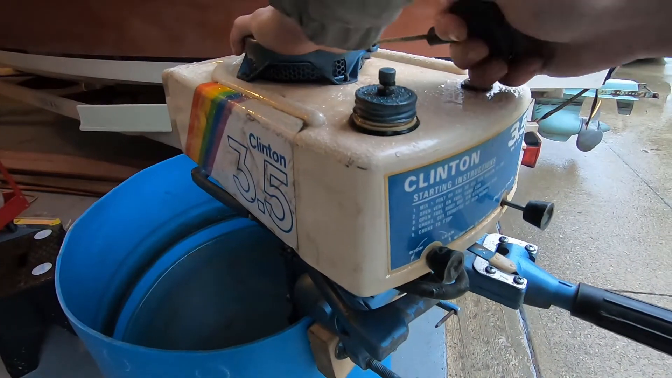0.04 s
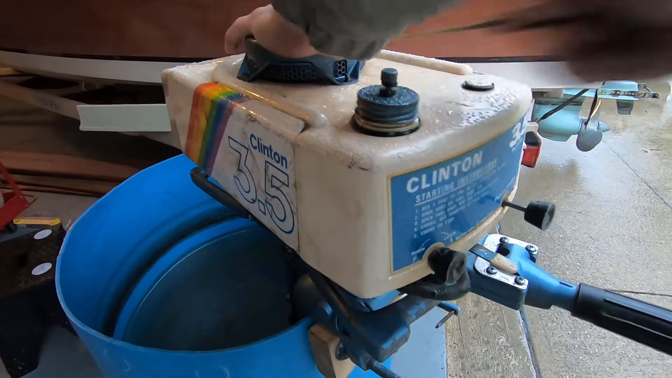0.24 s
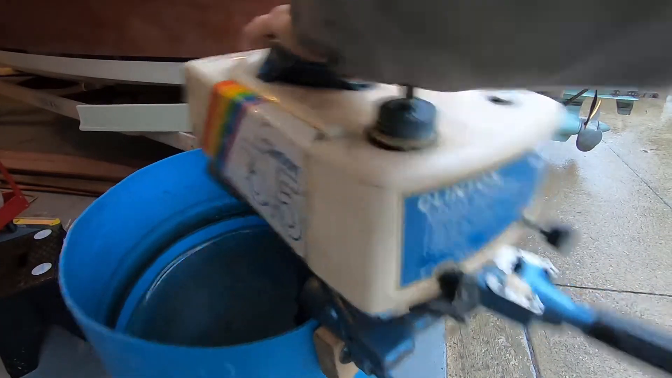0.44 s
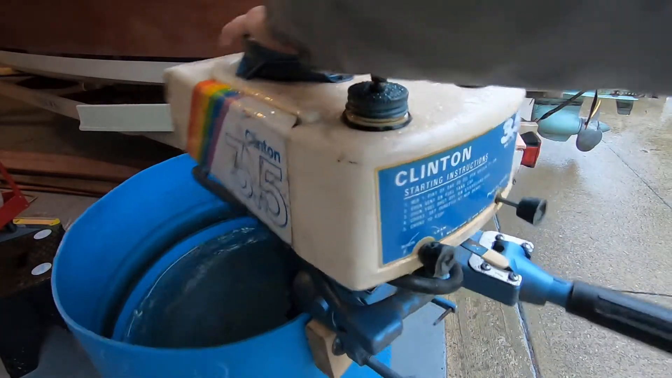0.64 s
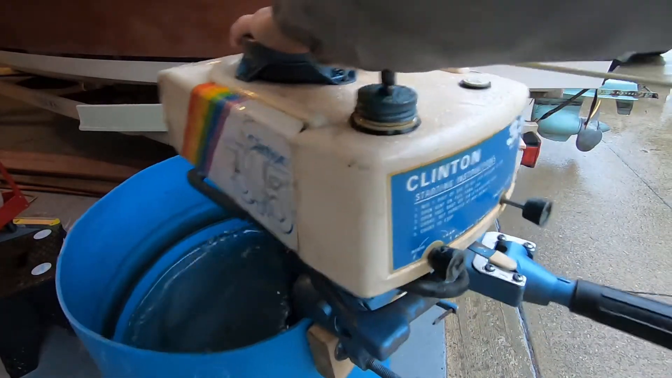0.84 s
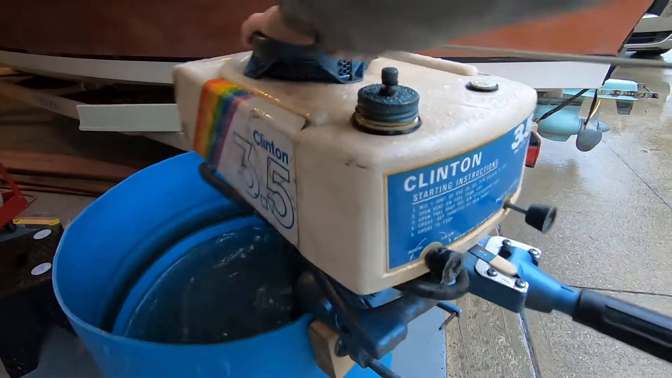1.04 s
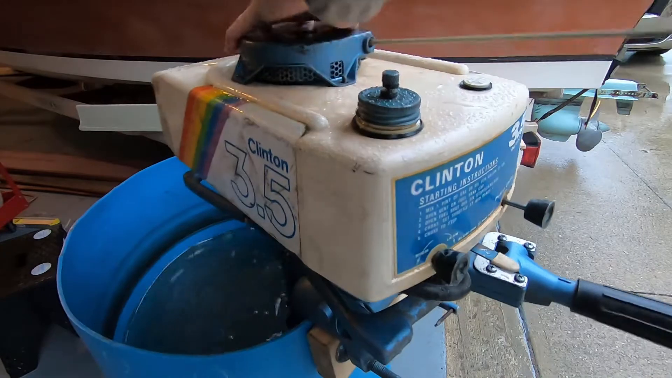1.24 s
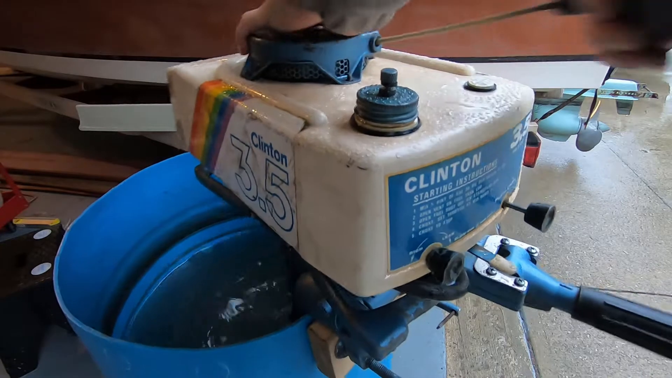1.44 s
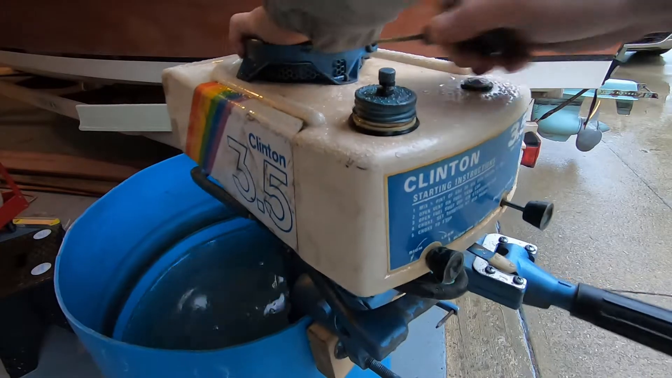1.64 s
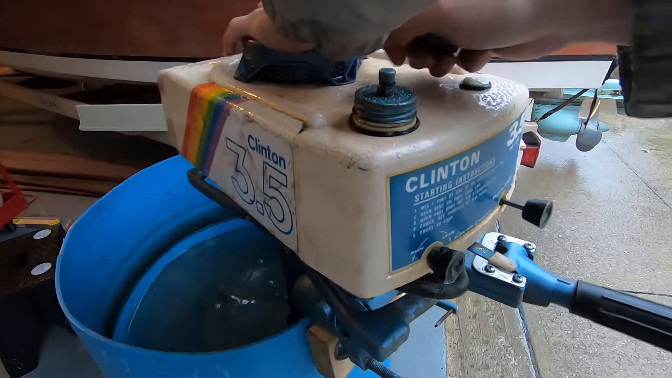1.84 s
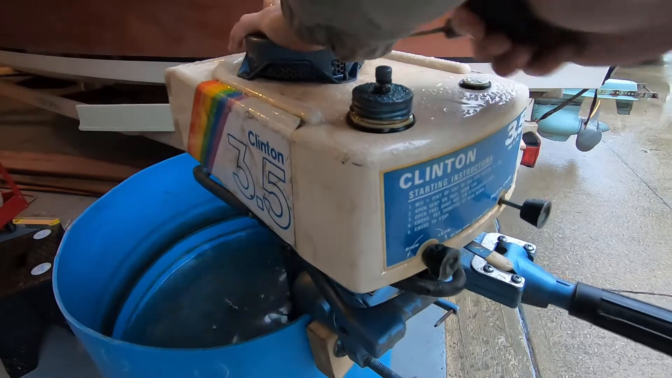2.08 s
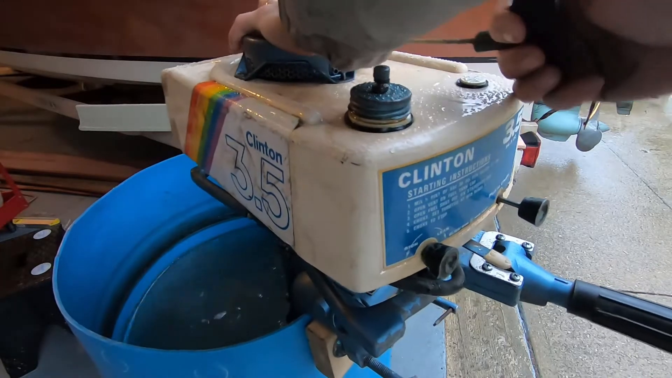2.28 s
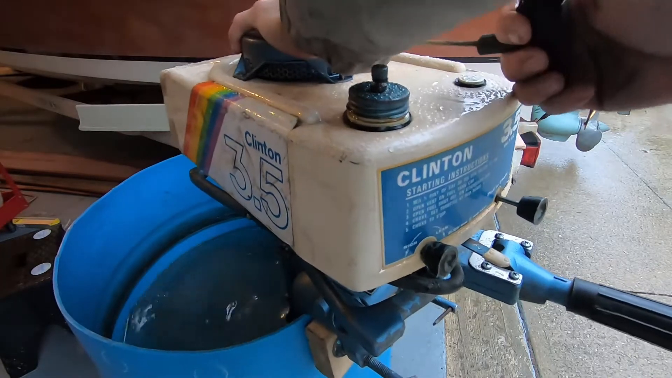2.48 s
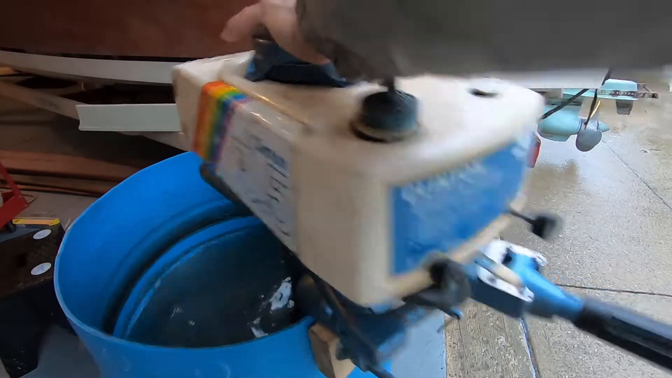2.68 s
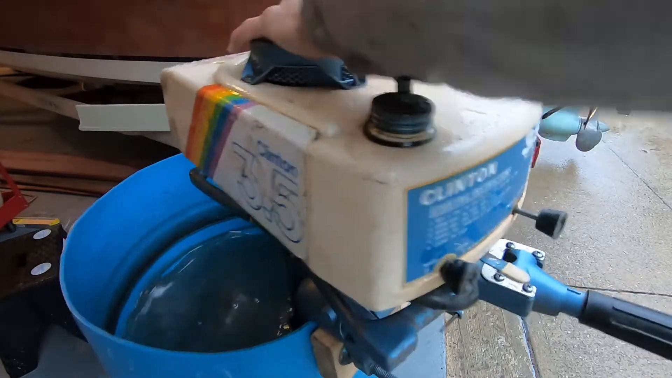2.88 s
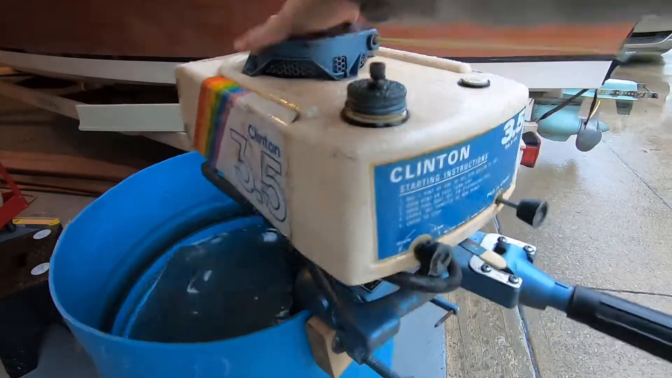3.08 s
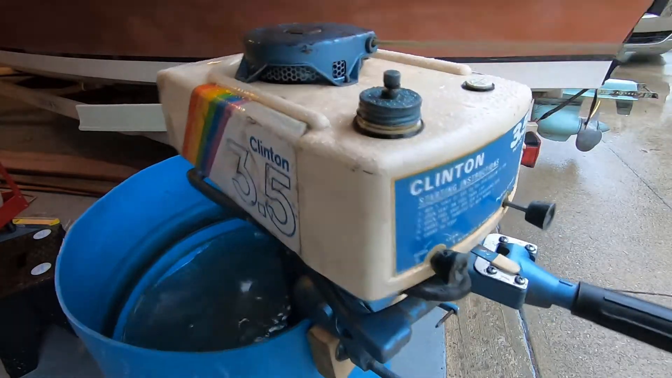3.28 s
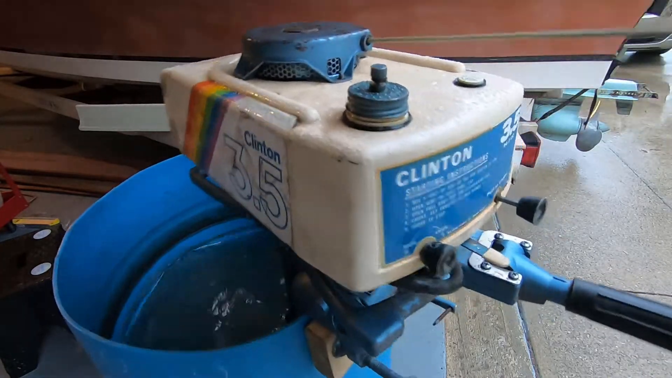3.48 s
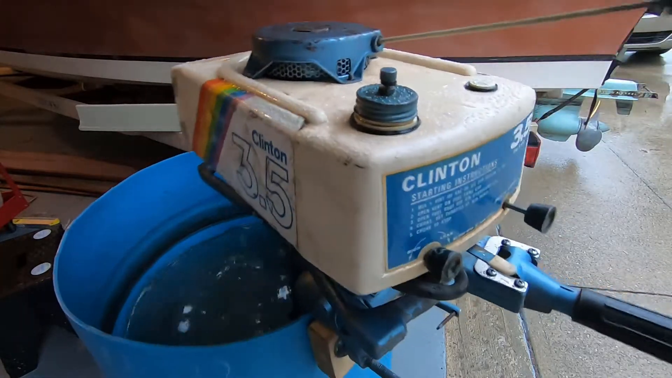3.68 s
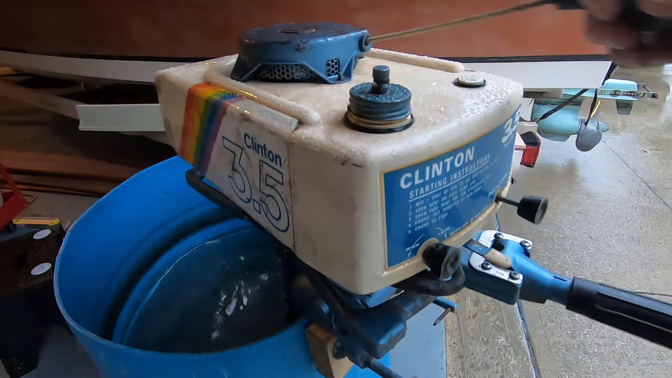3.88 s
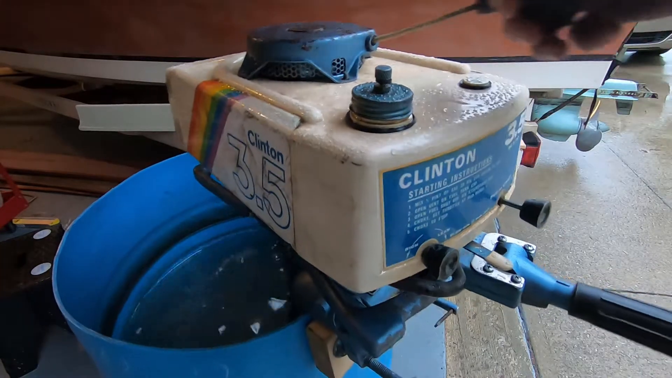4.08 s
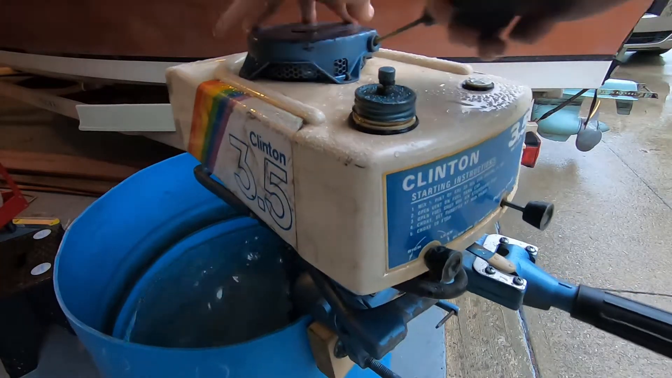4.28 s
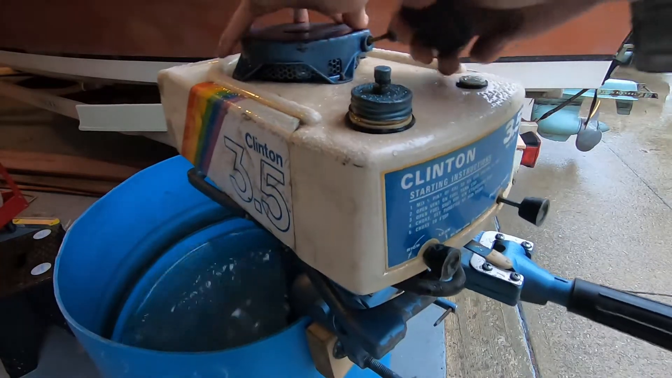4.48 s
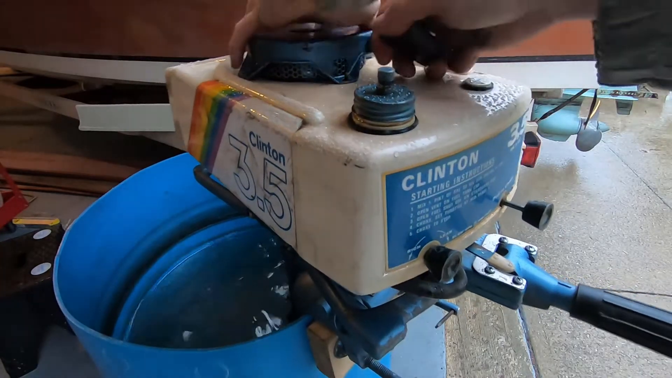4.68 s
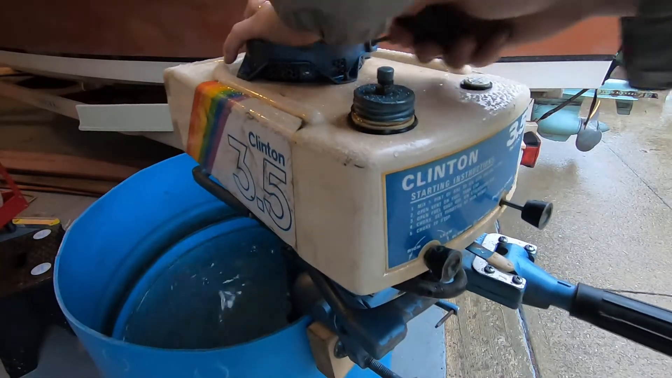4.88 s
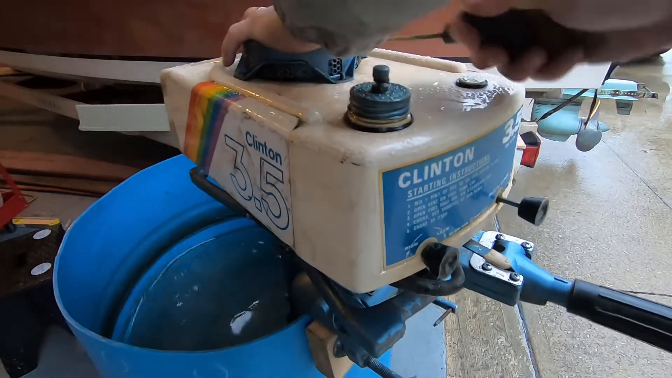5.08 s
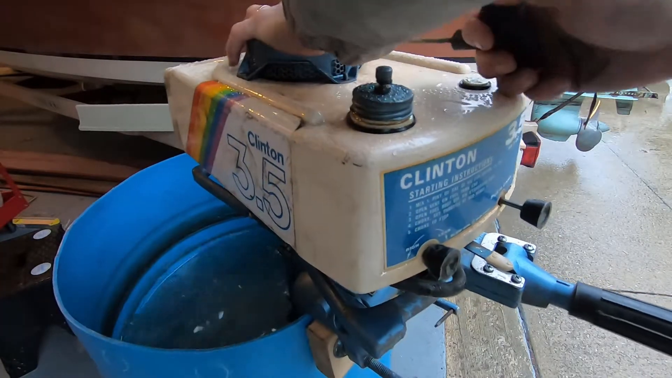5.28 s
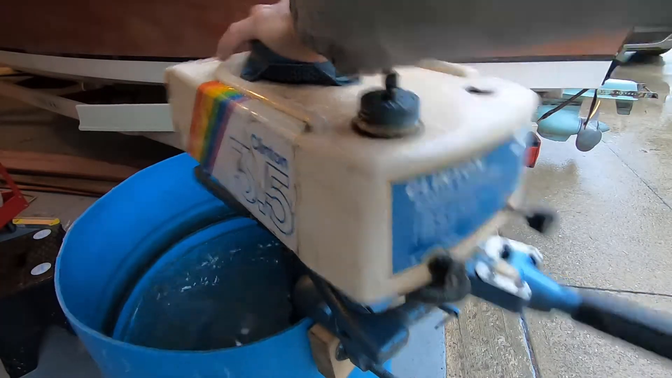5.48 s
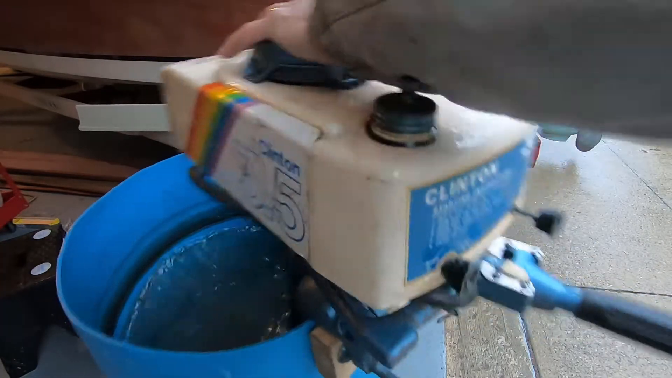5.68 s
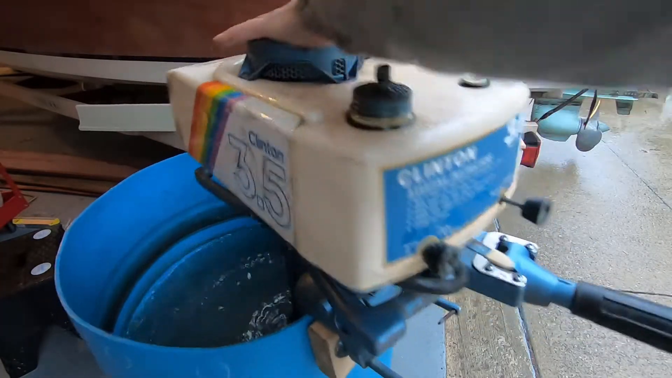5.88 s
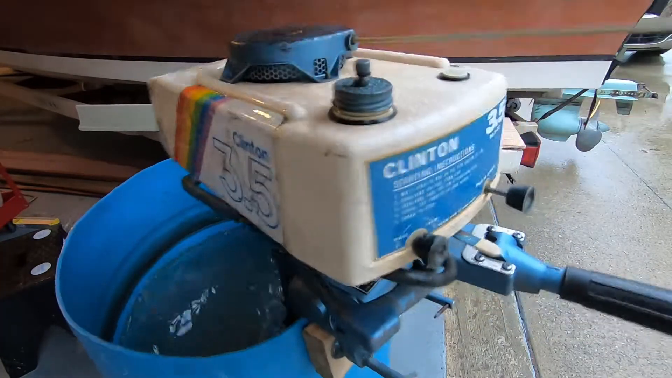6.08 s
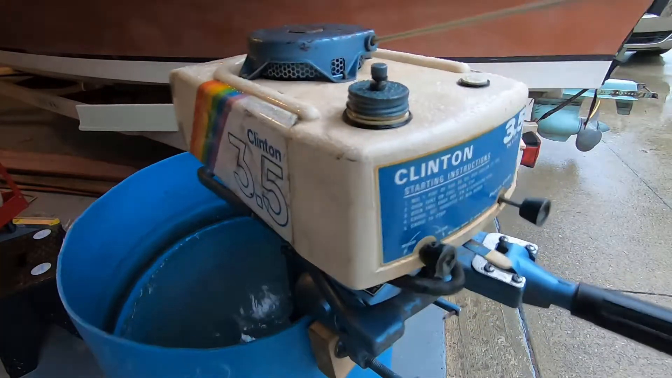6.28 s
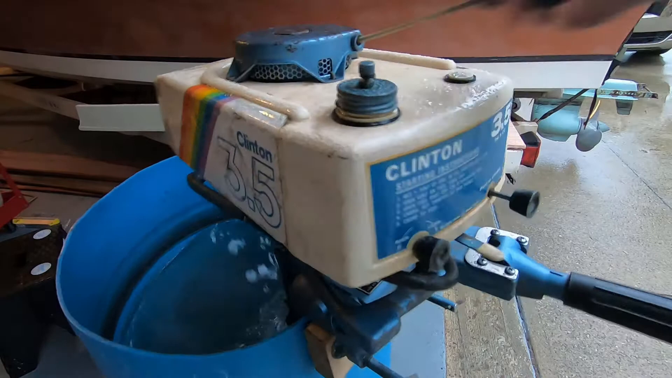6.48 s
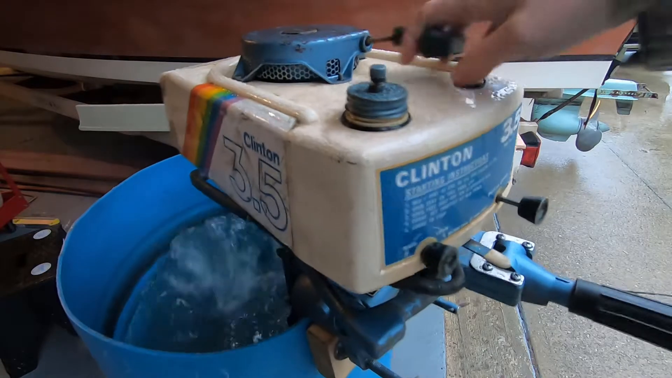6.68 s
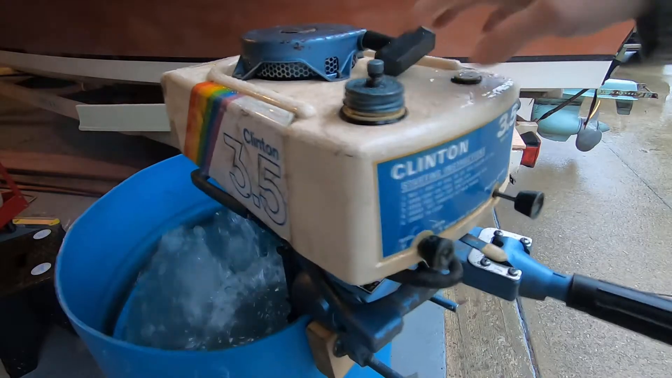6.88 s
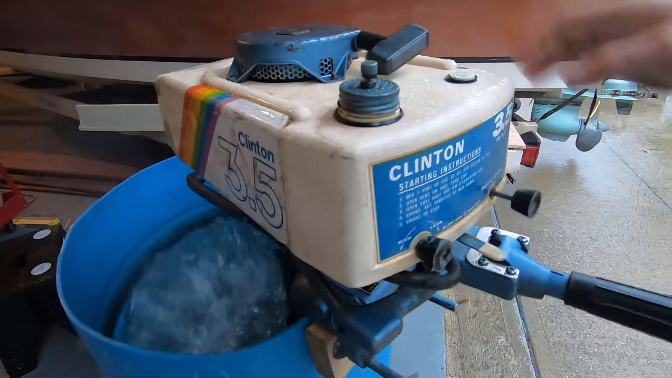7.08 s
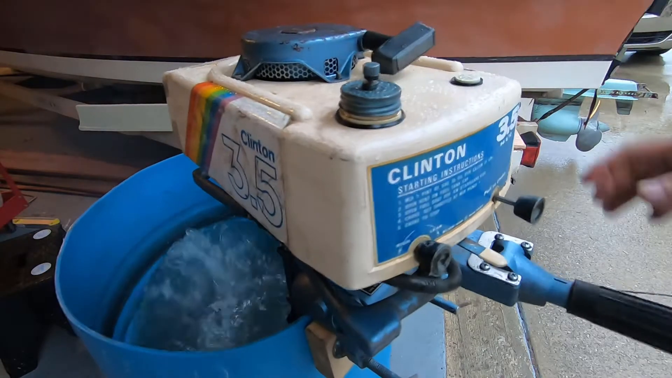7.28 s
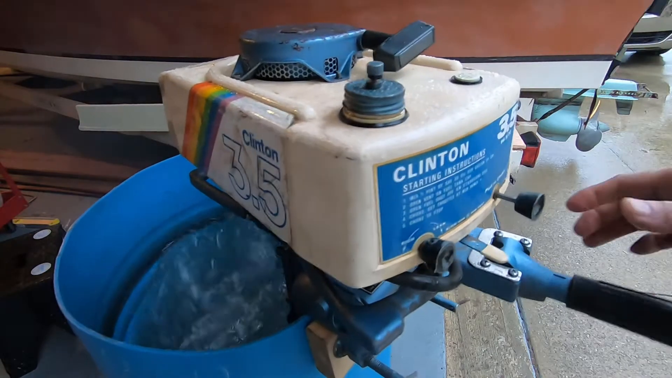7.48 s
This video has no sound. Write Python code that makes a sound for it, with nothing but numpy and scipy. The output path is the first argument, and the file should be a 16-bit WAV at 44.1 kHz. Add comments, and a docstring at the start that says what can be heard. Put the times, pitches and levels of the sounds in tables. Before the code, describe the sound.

A recoil cord is yanked three times on a small two-stroke outboard, with thudding gulps and rattles, until it fires into a buzzy, clattering run.

```python
"""In a garage, a small two-stroke outboard stands in a barrel of water. Its recoil cord is pulled three times:
slips and rattles make the starter's whirr, struck modes its clacks, and noise and low tones the piston's
gulps and chuffs. Between pulls the cord slides back and the pawls catch again. During the third pull it fires,
mostly on every second turn: ringing modes crack in the exhaust leg and boom in the barrel, and bursts of
tiny impacts clatter in every turn. Short pitched blips, a low rumble and the garage's short tail surround it."""
import sys
import numpy as np
from scipy import signal
from scipy.fft import rfft, irfft
from scipy.io import wavfile
from scipy.ndimage import uniform_filter1d

SR = 44100
rng = np.random.default_rng(int(sys.argv[2]) if len(sys.argv) > 2 else 0)


def store_wav(level_fs):
    """Save 16-bit WAV to argv[1]."""
    pcm = np.round(np.clip(np.atleast_2d(level_fs), -1, 1) * 32767)
    wavfile.write(sys.argv[1], SR, pcm.T.astype(np.int16))


N = 332514
TIME = np.arange(N) / SR
AGE = TIME[:SR // 2]  # time since the onset of any single sound, up to half a second

# hard pulls on the cord: (yank [s], arm stops [s], level [dB], run-down [dB/s])
PULLS = [(0.399, 0.72, -29, 48.5), (2.762, 2.988, -29.5, 49), (5.622, 5.878, -29.5, 316)]
YANK_DB_PER_S, TIRE_DB_PER_S = 331, 5.5  # a pull builds up fast and sags slowly
# fading whirr and hiss: the cord winding back, and in the last row the treble of the started motor:
# (start [s], end [s], settled whirr [dB], settled hiss [dB])
FADING_WHIRRS = [(1.201, 1.754, -60.5, -69.5), (3.407, 4.54, -67, -71.5), (6.08, 6.603, -47.5, -46.5)]
RUSH_DB, RUSH_HISS_DB, RUSH_S = 15, 12, 0.11  # each starts with a rush, then settles
# slack drawn out gently until the pawls catch: (start [s], end [s], level [dB])
DRAWS = [(.335, .37, -77), (2.047, 2.3, -56.5), (2.645, 2.74, -52), (4.975, 5.244, -57),
         (5.547, 5.6, -40.5)]
SLIDE_RISE_DB_PER_S, SLIDE_FALL_DB_PER_S = 223, 104  # draws and fading whirrs start and stop softly
FLOOR_DB = -77  # faint steady scrape and hiss under everything
# compression strokes without a spark: (knock time [s], knock [dB], its snap [dB], gulp [dB],
# chuff [dB], chuff lag [s], strain on the starter [dB])
STROKES = [(0.3081, -23.5, -21, -33, -22.5, 0.006, 8), (0.4793, -7.5, -27, -21, -6, 0.025, 4),
           (.561, -6, -14.5, -14.5, -6.5, 0.029, 5), (0.6531, -11, -32, -16, -7.5, 0.018, 1.5),
           (0.7358, -11, -16, -21, -9, 0.029, 1.5), (0.8816, -23, -27, -29, -20.5, 0.037, -1),
           (2.735, -33, -14, -39, -23, .023, -20), (2.8293, -10, -29, -19, -6, 0.0024, 2),
           (2.8893, -6.5, -11.5, -36, -10, 0.01, 5.5), (2.9612, -12, -43, -30, -10.5, .018, -6.5),
           (3.033, -18, -30, -16, -11.5, 0.0185, 5), (3.124, -28, -22, -20, -33, .025, -8),
           (3.203, -24.5, -15, -33.5, -21, 0.0074, -1.5), (3.2641, -14, -31, -28, -48, 0.071, 5),
           (5.67, -9.5, -26, -26.5, -10, 0.019, 7), (5.735, -11.5, -8, -23, -8, .028, 4)]
LOAD_LEAD_S, LOAD_WIDTH_S = 0.036, 0.023  # the starter strains just before each compression
# past each compression the flywheel runs ahead and the cord goes quiet
RELIEF_DB, RELIEF_LAG_S, RELIEF_WIDTH_S = -2.5, 0.029, 0.019
GULP_LEAD_S, GULP_HZ = .013, 460
STROKE_LOW_DB = -6  # thud of a stroke's knock
# tone of the starter's scrape: (frequency [Hz], level [dB])
WHIRR_TONE = [(710, -36), (1200, -20.5), (1520, -9), (1950, 3.5), (2400, -0.5), (3160, 1.5), (3820, 1.5),
              (4870, -11.5), (6000, -15.5), (7800, -72.5), (13200, -120)]
# tone of the low rumble under the scrape: (frequency [Hz], level [dB])
RUMBLE_TONE = [(30, -28), (130, -7), (220, -2), (339, -6), (442, -1), (584, -9), (671, -1), (731, -3),
               (1400, -14.5), (1820, -6.5), (3080, -120)]
# tone of the cord's hiss: (frequency [Hz], level [dB])
CORD_TONE = [(4200, -13.5), (5500, -1), (7400, 0), (8000, -6), (10000, -7.5), (11500, -25), (15000, -31)]
TICK_RATE, TICK_SPREAD_DB = 45, 2.5  # the spring's ticks: mean number per s, unevenness
TICK_DB, TICK_T60_S = -10.5, 0.023  # their level against the whirr, ring
# pawls and spring coils: (frequency [Hz], level [dB])
RATTLE_MODES = [(680, -5.5), (1020, -3), (1950, 2.5), (2700, -8), (3150, 1.5), (3500, -6), (3950, -3),
                (5300, -11), (7200, -15)]
RATTLE_RATE, RATTLE_RANGE_DB, RATTLE_DB = 115, 12, -3.5  # strikes per s, soft to hard, level against the whirr

# loose knocks of handle, pawls and mount: (time [s], level [dB], low band [dB], high band [dB])
CLACKS = [(0.231, -42, -4, -11), (0.5252, -22, -14, -26), (0.7626, -12, -6.5, -13), (0.7931, -13, -8, -20),
          (1.009, -27.5, -3.5, -39), (1.035, -19, -8.5, -25), (1.1128, -27, -6, -14),
          (1.702, -35.5, -28, -31.5), (1.737, -35, -21, -26), (2.2014, -13, -6.5, -11),
          (2.5868, -35.5, 1.5, -11), (2.6129, -33, -3, -19), (2.798, -24, -0.5, -10),
          (3.0697, -9.5, -12, -27), (3.1522, -13.5, -6, -29), (3.281, -13, -9, -21), (3.3446, -27, -4, -11),
          (3.767, -23.5, -19, -12.5), (4.137, -34.5, -23, -3.5), (4.362, -36.5, -14, -24),
          (4.714, -31, 3.5, -16.5), (5.138, -14.5, -6, -8), (5.141, -19.5, -6, -4),
          (5.3887, -37.5, -3.5, -11.5), (5.464, -36.5, -21, -12), (5.5473, -24, 0, -22),
          (5.7235, -10, -9.5, -17), (5.806, -9.5, -4, -26), (5.847, -18, -7, -23), (5.859, -8.5, -4, -15),
          (5.8812, -4.5, -10.5, -17.5), (5.8893, -6, -18, -13.5)]
# starter housing: (frequency [Hz], level [dB], t60 [s])
HOUSING = [(1986, 4, 0.045), (2280, 6, 0.077), (2500, -0.5, 0.13), (2920, -3, 0.072), (3220, -7, 0.056),
           (4070, 11, 0.029), (7400, -9, 0.099)]
HOUSING_SCATTER_DB = 4
# plastic cowl: (frequency [Hz], level [dB], t60 [s])
COWL = [(210.5, -4, 0.28), (352, -10.5, 0.12), (461.6, -3, 0.21), (714, -4.5, 0.17), (1011, 0.5, 0.07),
        (1395, -11, 0.19)]
# the pawls fly free and ring: (time [s], level [dB])
PAWL_FLINGS = [(0.767, -37), (5.889, -24.5)]
# a ringing pawl: (frequency [Hz], level [dB], t60 [s])
PAWL = [(2805, -2, .75), (2918, 0, .55), (3004, -9, .45), (7200, -10, .15), (8030, -23, .3),
        (11700, -23, .2), (12300, -27, .2)]
# light ticks and scrapes of cord, spring and handle: (time [s], level [dB], ringing pitch [Hz], t60 [s])
TICKS = [(.9286, -26, 2900, .035), (1.1664, -24, 2050, 0.084), (1.204, -28, 2100, 0.032),
         (1.245, -24.5, 2550, .018), (1.3382, -34, 3200, .03), (1.661, -34, 2980, 0.028),
         (1.947, -41, 2660, 0.018), (2.032, -47, 7460, 0.019), (2.286, -38.5, 7500, 0.016),
         (2.307, -40, 8000, 0.013), (2.398, -41, 3080, 0.035), (2.633, -36, 3300, 0.021),
         (2.651, -36, 3000, .025), (3.3876, -28, 3170, .02), (3.442, -31, 3000, .04),
         (3.4794, -39, 2600, 0.021), (3.6515, -30, 3080, 0.0092), (3.871, -39, 5170, 0.012),
         (3.951, -36, 2400, 0.038), (4.085, -35, 3260, 0.039), (4.51, -48, 2880, 0.035),
         (4.877, -29, 2680, .025), (4.977, -43, 2980, .04), (5.018, -44, 2700, .035),
         (5.1012, -31, 3230, 0.066), (5.312, -33.5, 2300, 0.039), (5.483, -38, 4200, .016),
         (5.507, -27, 3500, 0.021), (5.516, -34, 4300, 0.013)]
# the taut cord on its pulley: (time [s], length [s], pitch [Hz], glide [octaves/s], level [dB])
SQUEAKS = [(0.422, 0.043, 1960, 1, -21.5), (0.424, 0.032, 728, -12.5, -24.5),
           (0.82, 0.033, 2040, -3.5, -41), (3.019, 0.026, 1407, 3.5, -25.5), (4.497, .025, 2930, -1, -52),
           (4.972, 0.028, 2950, -5, -49), (5.558, 0.16, 2066, 1, -31), (5.639, 0.031, 632, -15, -24)]

CATCH_S, BITE_RISE_S = 5.825, .007  # the first firing; how fast each bite of clatter builds up
# crank speed once the motor has caught: (time [s], speed [turns/s])
SPEED = [(5.825, 16.5), (5.92, 28.34), (6.2, 30.56), (6.38, 30.37), (6.5, 28.26), (6.85, 27.46),
         (7.2, 26.1)]
# it fires on every second turn, except in these spells: (from [s], to [s], firing interval [turns])
SPELLS = [(5.8, 6.0, 1), (6.27, 6.34, 1), (6.97, 7.02, 3), (7.31, 7.36, 3)]
# the running motor: (time [s], clatter [dB], share of the water churned [0-1])
RUN = [(5.8, -15, 0.17), (5.95, -37, 0.13), (6.02, -26.5, 0.1), (6.09, -25.5, 0.4), (6.3, -26, 0.19),
       (6.6, -26.5, 0.8), (7.0, -24.5, 1), (7.54, -25, 1)]
# how well the charge burns: (time [s], firing thump [dB], firing crack [dB], idle turn's puff [dB])
BURN = [(5.83, -7, -23, -14), (6.06, -5.5, -21, -9), (6.2, -5, -18.5, -6.5), (6.42, -5.5, -19.5, -5.5),
        (6.64, -3.5, -20, -4), (6.8, -3, -18, -5), (6.93, -7, -20.5, -5), (7.17, -3.5, -18.5, -4),
        (7.27, -6, -20, -5), (7.45, -4, -17.5, -6.5)]
STALE_DB, STALE_CRACK_DB = -1.5, -10  # a firing is duller if no idle turn has cleared the cylinder
PUFF_SCATTER_DB = 1.2
# exhaust leg and barrel: (calm pitch [Hz], churned pitch [Hz], calm level [dB], churned level [dB], t60 [s])
BARREL = [(90, 110, -43, -4, 0.016), (196, 177, 5, -0.5, 0.069), (242, 220, -22, -23, 0.0079),
          (406.4, 408, -21, -17, 0.23), (617, 510, -18, -35, 0.13), (747, 850, -33, -15, 0.072)]
# the exhaust leg, rung by a firing's crack: (frequency [Hz], level [dB], t60 [s])
LEG = [(425, 0, .075), (525, -1, .06), (755, -7, .055), (1000, -12, .04), (1270, -9, .05)]
LEG_SCATTER_DB, LEG_DETUNE = 3, .035  # detune is a share of the pitch
GURGLE_DB, IDLE_RISE_S = -22, .0075  # level of the bubbles in the barrel; softness of an idle turn's puff
# tone of the clatter: (frequency [Hz], level [dB])
CLATTER_TONE = [(290, -32.5), (500, 2.5), (657, -3), (851, -5.5), (1560, -5.5), (2010, -3), (2260, -4),
                (2610, -3), (4130, -1), (4910, -12), (5350, -8), (7450, -13), (8000, -26.5), (9370, -17),
                (15500, -65)]
# engine castings and cowl: (frequency [Hz], level [dB], t60 [s])
CASTINGS = [(1224, -5, .12), (1798, -7, .14), (2082, -4, .08), (2600, -1, .1), (2966, -2, .08),
            (3200, 0, .05), (3800, -3, .04), (4137, -7, .1), (4266, -1.5, .16), (4580, -6, .08),
            (5277, -4, .12), (6010, -9, .14), (7500, -8, .03)]
CASTINGS_DB, THROAT_SWELL_DB = -10, 4.5  # the castings' ring in the clatter; unevenness of its throaty middle
# engine parts that come and go in the clatter: (frequency [Hz], level [dB])
JANGLES = [(2050, -20), (2600, -17), (3200, -13), (4150, -11)]
JANGLE_SWELL_DB = 5

# short pitched blips, bubbles or light scrapes: (time [s], pitch [Hz], level [dB], t60 [s])
BLIPS = [(.855, 1007, -26.5, 0.12), (4.168, 1710, -33.5, 0.044), (4.19, 3950, -26, 0.012),
         (4.229, 753, -34.5, 0.07), (4.25, 3490, -32, 0.018)]
# tone of the rumble through the open door: (frequency [Hz], level [dB])
AMBIENCE_TONE = [(15, -32), (25, -15), (65, 3), (174, 0), (418, -11.5), (555, -14), (700, -12.5),
                 (1300, -14.5), (2550, -26.5), (3050, -23.5), (4990, -38), (7540, -40.5), (12000, -53),
                 (15600, -70), (22000, -120)]
# stereo width, side against mid: (frequency [Hz], level [dB])
SIDE_TONE = [(60, -21), (130, -32), (220, -34), (380, -25), (700, -10), (1300, -7), (2400, -13.5),
             (4400, -10.5), (8000, -3), (15000, -1)]
TOP_HZ = 15200


def starter():
    """Cord, spring and pulley scrape in dense tiny slips; pawls rattle under load, the spring ticks when slack."""
    whirr_gain, rumble_gain, cord_gain = cord_work()
    tension = np.clip(whirr_gain / amp(-40), 0, 1)
    slips = grains(rate=700, spread_db=1.0) + .5 * rng.standard_normal(N)
    slips = slips * amp(3.13 * walk(70))
    whirr = unit(colour(slips, WHIRR_TONE))
    touches = signal.fftconvolve(grains(TICK_RATE, TICK_SPREAD_DB), fade(TICK_T60_S, rise=0.00067))[:N]
    metal = noise([(600, -16), (2000, 2.0), (2900, 11.5), (3800, -7), (5000, -30), (8000, -21), (12000, -47)])
    spring = unit(touches * metal)
    scrape = (1 - .3 * tension) * whirr
    scrape = scrape + amp(RATTLE_DB) * tension * rattle()
    scrape = scrape + amp(TICK_DB) * (1 - tension) * spring
    rumble = unit(colour(slips, RUMBLE_TONE))
    hiss = unit(colour(slips, CORD_TONE))
    return whirr_gain * scrape + rumble_gain * rumble + cord_gain * hiss


def cord_work():
    """Gains of whirr, rumble and hiss through draws, pulls and fading whirrs, over a faint steady floor."""
    load_db, relief = 0, 0
    for s, *_, strain_db in STROKES:
        load_db = load_db + strain_db * np.exp(-((TIME - s + LOAD_LEAD_S) / LOAD_WIDTH_S) ** 2)
        relief = relief + np.exp(-((TIME - s - RELIEF_LAG_S) / RELIEF_WIDTH_S) ** 2)
    pull = 0
    for yank, stop, db, fall in PULLS:
        pull = pull + amp(db + swell(yank, stop, YANK_DB_PER_S, TIRE_DB_PER_S, fall))
    pull = pull * amp(RELIEF_DB * relief)
    strain = pull * amp(load_db)
    slide = amp(FLOOR_DB)
    for start, end, db in DRAWS:
        slide = slide + amp(db + swell(start, end, SLIDE_RISE_DB_PER_S, 0, SLIDE_FALL_DB_PER_S))
    hiss = amp(-12.0) * slide
    for start, end, db, hiss_db in FADING_WHIRRS:
        outline = swell(start, end, SLIDE_RISE_DB_PER_S, 0, SLIDE_FALL_DB_PER_S)
        rush = np.exp(-np.maximum(TIME - start, 0) / RUSH_S)
        slide = slide + amp(db + outline + RUSH_DB * rush)
        hiss = hiss + amp(hiss_db + outline + RUSH_HISS_DB * rush)
    # the rumble follows the load only half as much
    rumble = amp(1.0 + load_db / 2) * pull + amp(2.0) * slide
    return strain + slide, rumble, amp(-12.5) * strain + hiss


def rattle():
    """Loose pawls and spring coils chatter in uneven strikes drawn from 16 metallic colours; rms 1."""
    strikes = []
    for _ in range(16):
        modes = [(hz * (1 + .04 * rng.standard_normal()), db, .02) for hz, db in RATTLE_MODES]
        strikes.append(unit(ring(modes, scatter_db=5)))
    out = np.zeros(N)
    for k, (slip, size, which) in enumerate(rng.random((int(RATTLE_RATE * TIME[-1]), 3))):
        strike = strikes[int(which * len(strikes))]
        add(out, (k + slip) / RATTLE_RATE, amp(RATTLE_RANGE_DB * size) * strike)
    return unit(out)


def cranking():
    """Without a spark the piston gulps air as noise, then pushes it into the barrel as soft low tones."""
    out = np.zeros(N)
    for s, _, _, gulp_db, chuff_db, lag, _ in STROKES:
        hz = GULP_HZ * (1 + .08 * rng.standard_normal())
        air = noise([(hz / 4, -30), (hz / 1.13, -10), (hz, 0), (hz * 1.17, -10), (hz * 4, -22),
                     (hz * 10, -42), (15000, -80)])
        add(out, s - GULP_LEAD_S, amp(gulp_db + 5.0) * piece(air) * fade(0.091, rise=0.0094))
        # leg and barrel answer: (pitch [Hz], level [dB], t60 [s], rise [s])
        modes = [(176.7, -3.5, 0.18, 0.0075), (143.7, -4.5, 0.15, 0.011), (88, 2.5, 0.043, 0.011)]
        for hz, mode_db, t60, rise in modes:
            hz *= 1 + .04 * rng.standard_normal()
            tone = np.sin(2 * np.pi * hz * AGE) * fade(t60, rise)
            add(out, s + lag, amp(chuff_db + mode_db) * tone)
    return out


def clacks():
    """Each knock is a short crack that rings the starter housing and a duller thud that rings the cowl."""
    crack = noise([(700, -24), (1500, -2.5), (2200, -1.5), (3500, 5.5), (4400, -9.0), (6000, -16.0),
                   (12000, -68.0), (15500, -71.0)])
    snap = noise([(3000, -7), (5000, -5.0), (7300, 5.5), (8200, -5.5), (10300, -3.5), (11500, -19.5),
                  (15500, -23.0)])
    thud = noise([(25, -7), (70, 3.0), (200, 2), (500, 0.5), (1100, -4.0), (2200, -38.0), (6000, -45)])
    contact = 1.25 * fade(.013, rise=.0003) + .11 * fade(.08, rise=.001)
    out = np.zeros(N)
    stroke_knocks = [(s, db, STROKE_LOW_DB, snap_db) for s, db, snap_db, *_ in STROKES]
    for s, db, low_db, high_db in stroke_knocks + CLACKS:
        bright = contact * (piece(crack) + amp(high_db + 5.5) * piece(snap))
        bright = bright + amp(-21.0) * ring(HOUSING, HOUSING_SCATTER_DB)
        dull = amp(-6) * piece(thud) * fade(0.099, rise=0.0033)
        dull = dull + amp(-15.0) * ring(COWL, scatter_db=3.0)
        add(out, s, amp(db) * (amp(-4.0) * bright + amp(low_db) * dull))
    for s, db in PAWL_FLINGS:
        add(out, s, amp(db) * ring(PAWL))
    return out


def ticks():
    """Cord and handle catch and let go: a burst of tiny slips, each tick ringing at its own pitch."""
    out = np.zeros(N)
    slips = grains(rate=1600, spread_db=0.5)
    for s, db, hz, t60 in TICKS:
        rub = unit(piece(slips)) * fade(t60, rise=.0004)
        tone = [(hz / 6, -20), (hz / 1.5, -6), (hz, 6), (hz * 1.35, -6), (hz * 2.6, -14), (hz * 5, -36)]
        add(out, s, amp(db) * colour(rub, tone))
    return out


def squeaks():
    """The taut cord squeaks and groans: short gliding tones, hoarse from a wandering size and phase."""
    out = np.zeros(N)
    for s, length, hz, glide, db in SQUEAKS:
        pitch = hz * 2 ** (glide * np.minimum(AGE, length))
        phase = 2 * np.pi * np.cumsum(pitch) / SR
        tone = np.real((.7 + .7 * quiver(width=130)) * np.exp(1j * phase))
        arch = np.sin(np.pi * np.minimum(AGE / length, 1))
        add(out, s, amp(db) * tone * arch)
    return out


def motor():
    """Fired turns crack and boom, idle turns puff softly; metal clatters in bites within every turn."""
    clatter_db, churn = curves(RUN)
    burn = curves(BURN)
    boom, slack, bark = np.zeros((3, N))
    for start, period, fired, stale in crank_turns():
        water = np.interp(start, TIME, churn)
        thump_db, crack_db, idle_db = (np.interp(start, TIME, c) for c in burn)
        if fired:
            crack = amp(crack_db + STALE_CRACK_DB * stale)
            add(bark, start, crack * fade(0.22, rise=0.0014))
            puff = amp(thump_db + STALE_DB * stale) * exhaust(water, rise=0.0053) + crack * leg_crack()
        else:
            puff = amp(idle_db) * exhaust(water, rise=IDLE_RISE_S)
        add(boom, start, amp(PUFF_SCATTER_DB * rng.standard_normal()) * puff)
        # the slack is taken up in one bite on an idle turn, in two after a firing: (share of turn, level [dB])
        for phase, bite_db in [(.42, -4), (.62, -5.5)] if fired else [(.58, 0)]:
            lag, size_db = rng.standard_normal(2) * (.025, 1.2)
            add(slack, start + period * (phase + lag), amp(bite_db + size_db) * bite(width=0.0097))
    running = np.clip((TIME - CATCH_S) / .03, 0, 1)
    impacts = (grains(rate=3000, spread_db=2) + .6 * rng.standard_normal(N)) * (slack + .2 * running)
    metal = clatter(impacts)
    scale = np.sqrt(np.mean(running))  # makes up for the silence before the catch
    gas = bark * noise([(100, 14), (450, -1.5), (1100, 1), (2500, -0.5), (6000, -5.5), (7500, -4),
                        (9500, -5.5), (11500, -20.5), (15000, -38)])
    bubbling = running * amp(2 * walk(23)) * noise([(18, -2), (28, 13), (45, -5), (110, 9), (300, 8.5),
                                                    (500, -44), (800, 7.5), (1500, -40), (5000, -64)])
    wet = amp(-34.0) * bubbling + amp(GURGLE_DB) * gurgle(churn)
    return boom + scale * amp(clatter_db) * metal + amp(-8.5) * gas + wet


def crank_turns():
    """Every turn of the running motor: (start [s], length [s], fired or not, whether the turn before fired)."""
    speed, = curves(SPEED)
    angle = np.cumsum(speed * (TIME >= CATCH_S)) / SR
    turns, wait, stale = [], 0, False
    for i in np.searchsorted(angle, np.arange(angle[-1]), side="right"):
        fired = wait == 0
        if fired:
            wait = next((every for start, end, every in SPELLS if start <= TIME[i] < end), 2)
        turns.append((TIME[i], 1 / speed[i], fired, stale))
        wait, stale = wait - 1, fired
    return turns


def exhaust(churn, rise):
    """One puff rings leg and barrel; bubbles in the water shift the resonances."""
    out = 0
    for calm_hz, churned_hz, calm_db, churned_db, t60 in BARREL:
        hz = calm_hz + churn * (churned_hz - calm_hz)
        hz = hz * (1 + 0.025 * rng.standard_normal())
        db = calm_db + churn * (churned_db - calm_db)
        out = out - amp(db) * np.sin(2 * np.pi * hz * AGE) * fade(t60, rise)
    return out


def leg_crack():
    """A firing rings the exhaust leg, with pitch and balance varied at random."""
    modes = [(hz * (1 + LEG_DETUNE * rng.standard_normal()), db, t60) for hz, db, t60 in LEG]
    return ring(modes, LEG_SCATTER_DB) * (1 - np.exp(-AGE / .001))


def bite(width):
    """The envelope of a short burst of rattling: a quick rise and a rounded fall."""
    return np.minimum(AGE / BITE_RISE_S, 1) * np.exp(-(AGE / width) ** 2)


def clatter(impacts):
    """The impacts sound through the metal: a broad clatter, swelling parts, ringing castings, a throaty middle."""
    metal = amp(-1.5) * unit(colour(impacts, CLATTER_TONE)) + jangle(impacts)
    metal = metal + amp(CASTINGS_DB) * unit(signal.fftconvolve(impacts, ring(CASTINGS))[:N])
    throat = unit(colour(impacts, [(400, -26.0), (800, 9.5), (1400, -3.5), (2200, -6.0), (6000, -41.5)]))
    return metal + amp(-19.5 + THROAT_SWELL_DB * walk(30)) * throat


def jangle(impacts):
    """Narrow bands of the impacts swell independently, so the clatter keeps changing colour."""
    out = 0
    for hz, db in JANGLES:
        peak = [(hz / 2, -45), (hz / 1.12, -16), (hz, 0), (hz * 1.12, -16), (hz * 2, -45)]
        swelling_db = JANGLE_SWELL_DB * np.minimum(walk(45), 1.8)
        out = out + amp(db + swelling_db) * unit(colour(impacts, peak))
    return out


def gurgle(churn):
    """Exhaust bubbles ring in the churned water, each rising in pitch."""
    out = np.zeros(N)
    for when, pitch, size in rng.random((70, 3)):
        s = CATCH_S + when * (TIME[-1] - CATCH_S)
        hz = 420 * 3 ** pitch
        bubble = fade(40 / hz, rise=0.00085) * np.sin(2 * np.pi * hz * AGE * (1 + 2.0 * AGE))
        add(out, s, amp(-12 * size) * bubble)
    return out * np.sqrt(np.clip(churn, 0, 1))


def blips():
    """Short pitched blips, bubbles or light scrapes: a noise tick and a ring that rises slightly in pitch."""
    tick = noise([(1000, -11), (2500, 5), (4500, 0), (9000, -19), (14000, -26)])
    out = np.zeros(N)
    for s, hz, db, t60 in BLIPS:
        tone = fade(t60, rise=0.00084) * np.sin(2 * np.pi * hz * AGE * (1 + 0.44 * AGE))
        add(out, s, amp(db) * (tone + amp(-8.0) * piece(tick) * fade(0.018, rise=.0005)))
    return out


def ambience():
    """A low, wavering rumble comes in through the open door."""
    return amp(-49.0 + 2 * walk(9.1)) * noise(AMBIENCE_TONE)


def spread(x):
    """Random, slowly changing short filters widen the sound: the ears differ in the treble, hardly in the bass."""
    side = 0
    for _ in range(4):
        taps = rng.standard_normal(len(AGE)) * fade(.012)
        side = side + walk(24) * signal.fftconvolve(x, taps / np.linalg.norm(taps))[:N] / 2
    side = colour(side, SIDE_TONE)
    return np.array([x + side, x - side])


def garage(x, t60, wet_db):
    """Close walls and a concrete floor give each ear its own short tail; the bass escapes through the door."""
    ears = []
    for _ in range(2):
        tail = rng.standard_normal(len(AGE)) * fade(t60, rise=.004)
        tail = tail / np.linalg.norm(tail)
        tail = colour(tail, [(100, -24), (220, -18), (500, -2), (900, 0), (3500, 0), (8000, -1), (14000, -8)])
        ears.append(amp(wet_db) * signal.fftconvolve(x, tail)[:N])
    return np.array(ears)


def amp(db):
    """Decibels to gain."""
    return 10 ** (np.asarray(db) / 20)


def unit(x):
    """Scale to rms 1."""
    return x / np.sqrt(np.mean(x ** 2))


def curves(table):
    """Each column of a timed table, sample by sample."""
    s, *columns = np.transpose(table)
    return [np.interp(TIME, s, c) for c in columns]


def colour(x, points):
    """Filter by a (frequency [Hz], level [dB]) spectrum with minimum phase, so nothing sounds early."""
    hz, db = np.transpose(points)
    size = 4096
    grid = np.log(np.maximum(np.arange(size // 2 + 1) * SR / size, 1))
    # folding the cepstrum onto positive times makes the filter causal
    cepstrum = irfft(np.log(amp(np.interp(grid, np.log(hz), db))))
    cepstrum[1:size // 2] *= 2
    cepstrum[size // 2 + 1:] = 0
    response = irfft(np.exp(rfft(cepstrum)))
    return signal.fftconvolve(x, response)[:len(x)]


def noise(points):
    """Coloured noise of rms 1."""
    return unit(colour(rng.standard_normal(N), points))


def walk(rate):
    """A smooth random drift of rms 1, with about so many new values per s."""
    k = int(SR / rate)
    steps = np.repeat(rng.standard_normal(N // k + 1), k)
    return unit(uniform_filter1d(steps, k)[:N])


def fade(t60, rise=0):
    """An envelope that rises and dies away, in s."""
    return amp(-60 * AGE / t60) * (1 - np.exp(-AGE / max(rise, 1 / SR)))


def ring(modes, scatter_db=0):
    """Struck modes, their balance and polarity varied at random."""
    out = 0
    for hz, db, t60 in modes:
        gain = amp(db + scatter_db * rng.standard_normal()) * rng.choice([-1, 1])
        out = out + gain * fade(t60) * np.sin(2 * np.pi * hz * AGE)
    return out


def add(track, s, sound):
    """Mix a sound in at time s."""
    i = min(max(int(s * SR), 0), N)
    track[i:i + len(sound)] += sound[:N - i]


def piece(x):
    """A random half second of a noise."""
    return x[rng.integers(N - len(AGE)):][:len(AGE)]


def grains(rate, spread_db):
    """Random tiny impacts of uneven size, so many per s on average, rms 1."""
    size = amp(spread_db * np.minimum(rng.exponential(size=N), 4))
    return unit((rng.random(N) < rate / SR) * size * rng.choice([-1, 1], N))


def swell(start, end, rise, sag, fall):
    """Attack, sagging hold and release, as a level in dB; the three slopes are in dB per s."""
    attack = -rise * np.maximum(start - TIME, 0)
    hold = -sag * np.clip(TIME - start, 0, end - start)
    release = -fall * np.maximum(TIME - end, 0)
    return attack + hold + release


def quiver(width):
    """The wandering size and phase of a rubbed resonance about so many Hz wide, each part rms 1."""
    k = max(int(SR / width), 1)
    a, b = uniform_filter1d(uniform_filter1d(rng.standard_normal((2, len(AGE))), k), k)
    return unit(a) + 1j * unit(b)


def scene():
    """The motor in its garage: direct sound and rumble in stereo, plus the room's tail."""
    outboard = starter() + cranking() + clacks() + ticks() + squeaks() + motor() + blips()
    return spread(outboard + ambience()) + garage(outboard, t60=0.26, wet_db=-8.5)


def record(dry):
    """A steep elliptic low-pass ends the treble at TOP_HZ."""
    return signal.sosfilt(signal.ellip(10, .2, 80, TOP_HZ, fs=SR, output="sos"), dry)


dry = scene()
out = record(dry)
store_wav(out)
```